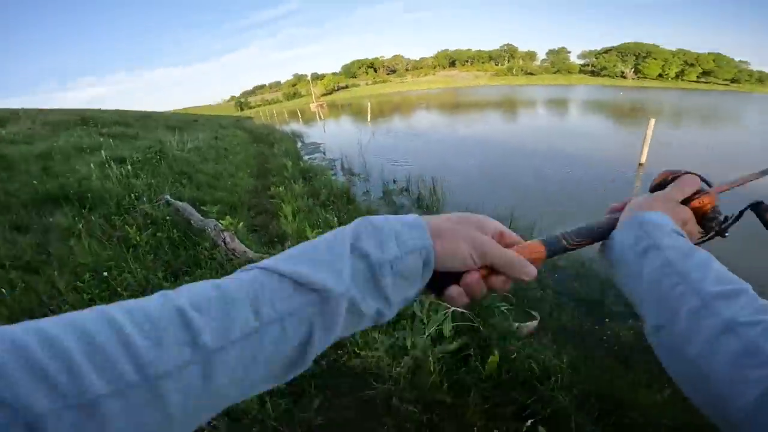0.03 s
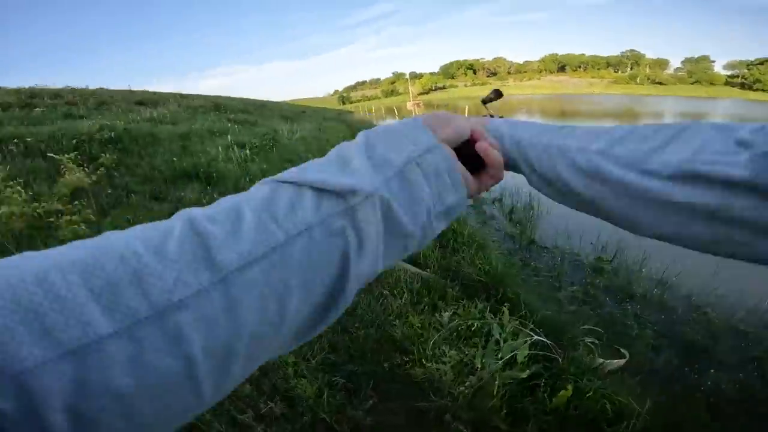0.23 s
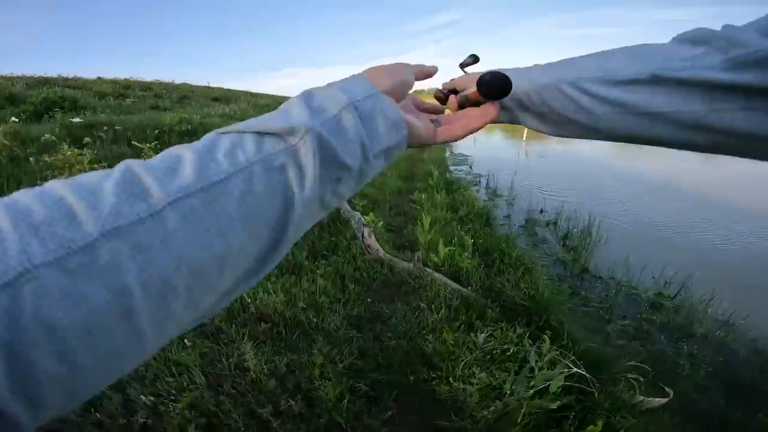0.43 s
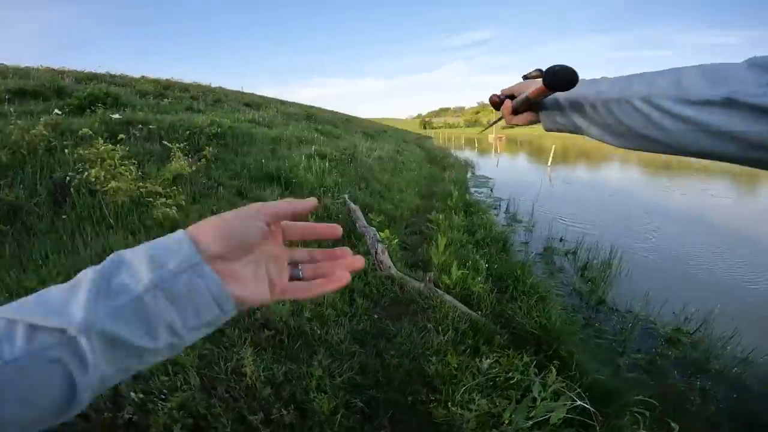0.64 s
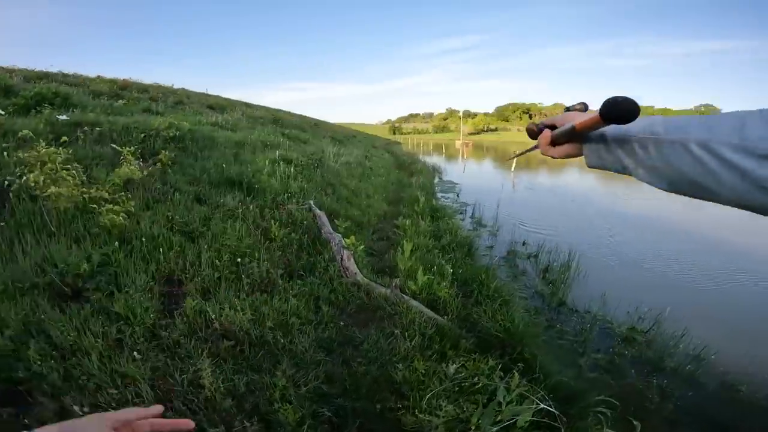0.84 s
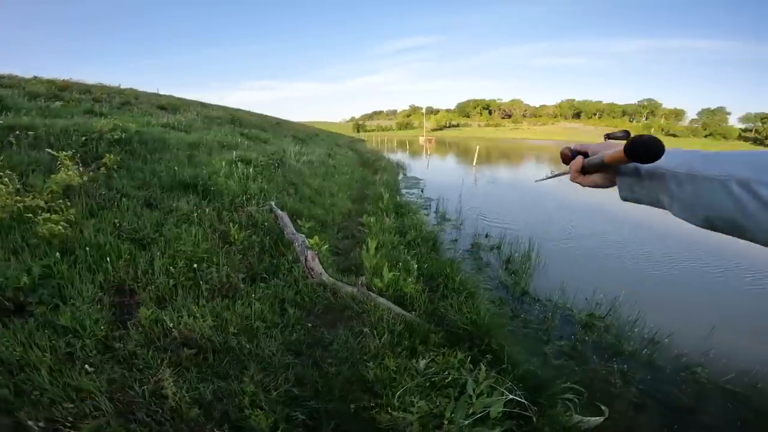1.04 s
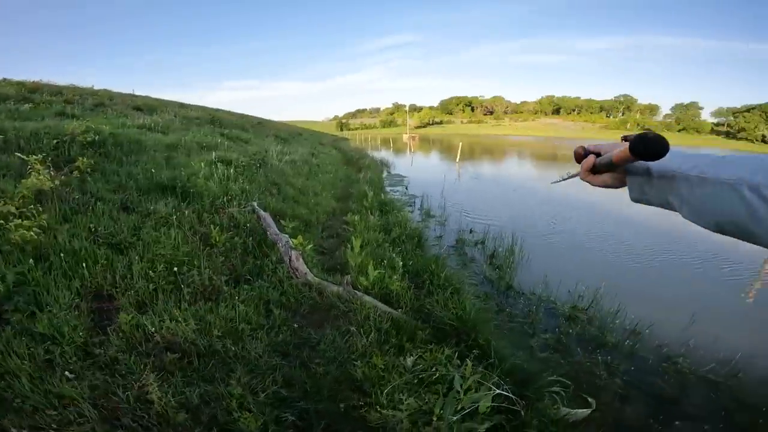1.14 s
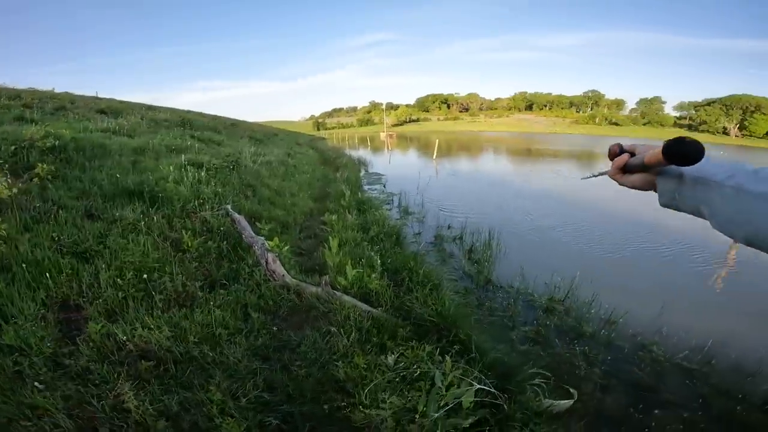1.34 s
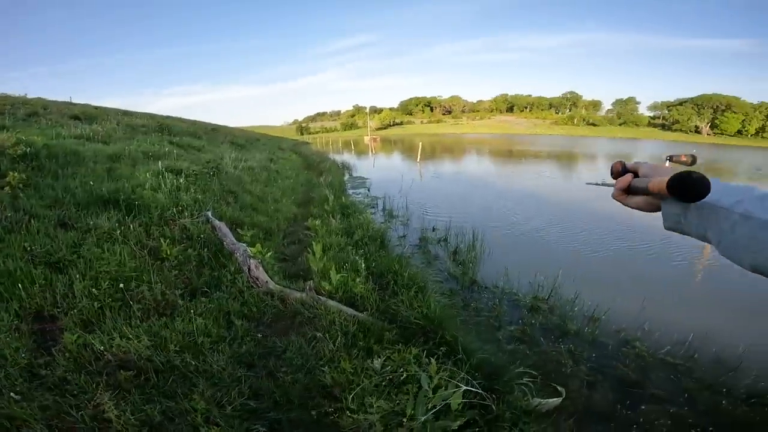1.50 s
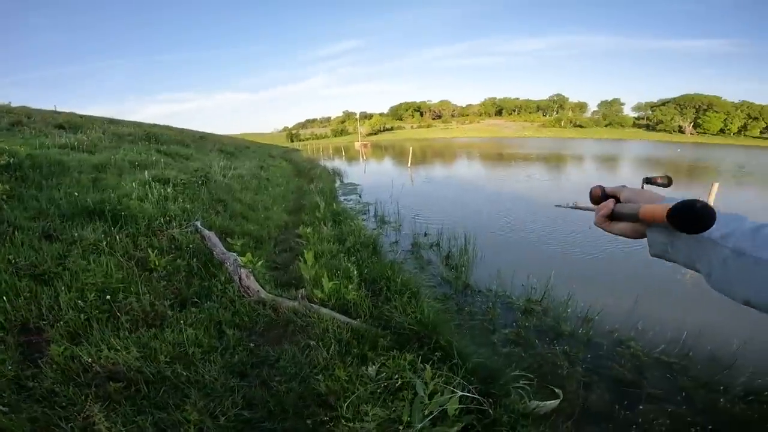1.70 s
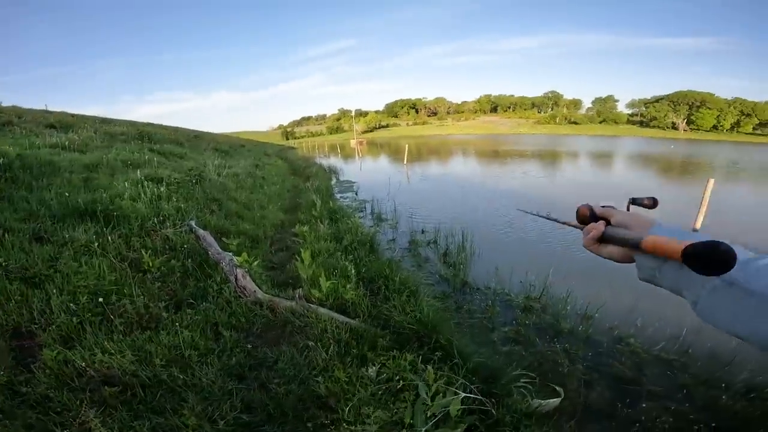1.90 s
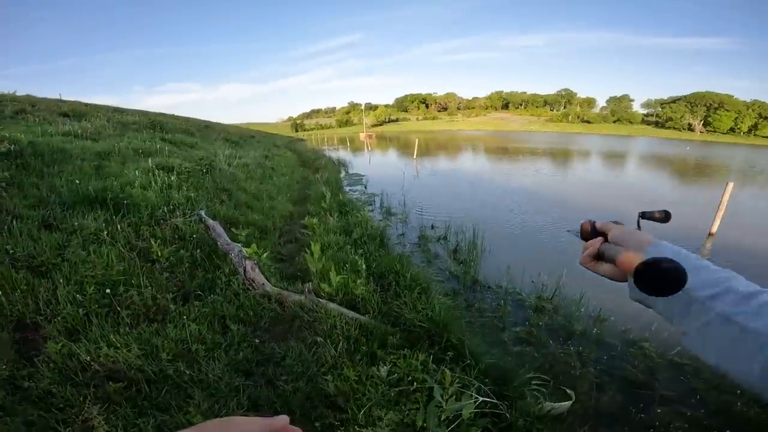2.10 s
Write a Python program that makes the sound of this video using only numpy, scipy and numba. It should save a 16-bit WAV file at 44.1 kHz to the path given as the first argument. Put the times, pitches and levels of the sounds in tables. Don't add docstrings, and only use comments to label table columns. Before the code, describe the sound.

A fishing reel whirs through a cast, its pitch falling as line hisses out beside a pond

```python
import sys
import numpy as np
from scipy import signal
from scipy.fft import rfft, irfft
from scipy.io import wavfile
from scipy.ndimage import uniform_filter1d
from numba import njit

SR = 44100
rng = np.random.default_rng(int(sys.argv[2]) if len(sys.argv) > 2 else 0)


def decibels_to_gain(level_db):
    exponent = np.asarray(level_db, float) / 20
    return 10 ** exponent


def dump(signal):
    limited = np.clip(np.atleast_2d(signal).T, -1, 1)
    pcm = np.round(limited * 32767).astype(np.int16)
    wavfile.write(sys.argv[1], SR, pcm)


N = 94815
TIME = np.arange(N) / SR

# [f/Hz, level/dB per Hz]
WIND_SPECTRUM = [(15, -8), (30, -14), (60, -12.5), (125, -23), (165, -17), (220, -21.5), (400, -34.5),
                 (800, -52)]
# [t/s, level/dB]
GUST_LEVEL = [(0, -48.5), (.2, -47), (.3, -38), (.42, -47.5), (.7, -54), (.98, -53), (1.17, -54),
              (1.3, -53), (1.55, -53.5), (1.8, -51.5), (2.05, -48.5), (2.15, -53.5)]
# [f/Hz, level/dB per Hz]
MEADOW_SPECTRUM = [(150, -33), (350, 0.5), (1300, -1), (2500, -17.5), (4500, -18), (7500, -30),
                   (14000, -47)]
# [t/s, peak level/dB, width/s, 1 pull first or -1 push first]
BODY_JOLTS = [(.495, -52, .016, 1), (.881, -44, 0.0095, -1), (0.981, -40.5, 0.0079, -1),
              (1.006, -47.5, 0.014, 1), (1.154, -40.5, 0.0056, 1), (1.385, -44.5, 0.0064, 1),
              (1.433, -42.5, 0.0051, 1), (1.531, -45.5, 0.0093, 1), (2.035, -49, 0.0067, -1),
              (2.14, -47, .01, -1)]
# [f/Hz, level/dB per Hz]
CLOTH_SPECTRUM = [(150, -31), (400, -10.5), (1000, -8), (3800, -12), (7500, -18.5), (12000, -30.5),
                  (15000, -34)]
# [t/s, level/dB]
RUSTLE_LEVEL = [(0, -57.5), (.055, -49.5), (.075, -53), (.125, -50), (.155, -49.5), (.222, -49.5),
                (.255, -34), (.272, -47.5), (.4, -57), (.89, -63.5), (.92, -56), (.97, -69), (1.3, -72),
                (1.42, -63.5), (1.66, -72), (1.71, -73.5), (2.0, -73.5), (2.11, -64.5)]
# [t/s, peak level/dB, ring f/Hz]
CLICK_RINGS = [(0.011, -41.5, 7660), (0.0518, -36, 1700), (.0525, -35, 2700), (.058, -37, 3570),
               (.06, -43, 1050), (0.139, -38, 1490), (.155, -35, 1020), (.171, -29, 980),
               (0.2655, -18.5, 1430), (.2655, -30, 2970), (.2655, -33, 4740), (0.32, -31, 3860),
               (.341, -34, 4900), (.364, -26, 4860), (0.375, -22, 3860), (0.386, -25.5, 2780),
               (1.3755, -43, 3400), (1.3795, -40.5, 2080), (1.3805, -44, 3240), (1.388, -44, 3840),
               (1.6955, -46.5, 3800), (1.6958, -46.5, 7160), (1.6955, -52, 10100), (1.7535, -47.5, 3680),
               (1.766, -53, 3230), (1.766, -57, 6900), (1.7728, -50, 2900), (1.786, -50, 2750),
               (1.811, -50.5, 7400), (1.813, -51.5, 2770), (1.97, -54, 2900), (2.022, -59, 7240),
               (2.1042, -46, 3320)]
# [f/Hz, level/dB]
SNAP_MODES = [(2900, 5), (4400, 3.5), (7900, 6), (12300, -15)]
# [t/s,
# decay/s, level/dB, centre f/Hz, width f/Hz]
SCUFF_BANDS = [(0.277, 0.087, -52.5, 7560, 2200), (0.282, 0.045, -43.5, 1160, 1190),
               (0.307, 0.025, -38, 1620, 1180), (0.313, 0.024, -39, 436, 695),
               (1.375, 0.017, -48, 2416, 4430), (1.377, .03, -55, 899, 920),
               (1.401, 0.0078, -56.5, 910, 242), (1.418, .007, -48.5, 1530, 350),
               (1.373, 0.16, -63.5, 7170, 3040), (1.42, 0.024, -60, 3500, 1990),
               (1.475, 0.027, -71, 6580, 580), (1.533, 0.023, -60.5, 6340, 500),
               (1.539, 0.032, -57.5, 5390, 590), (1.555, 0.059, -65.5, 3930, 1400),
               (1.601, 0.067, -65.5, 3640, 1200), (1.453, 0.12, -72.5, 6580, 1200),
               (1.753, 0.048, -67, 3260, 1600), (2.012, 0.019, -63, 2320, 4870)]
# [f/Hz, level/dB per Hz]
RUSH_SPECTRUM = [(90, -33), (170, -2.5), (2000, -7), (5000, -5), (8000, -18), (12000, -44), (15000, -33)]
# [t/s, centre f/Hz, level/dB]
ROD_SWEEP = [(.27, 7740, -62), (.298, 7600, -45.5), (.315, 1950, -40), (.335, 2330, -39),
             (.37, 3880, -40.5), (.39, 3930, -42), (.403, 4400, -45.5), (.45, 4800, -51),
             (.55, 4400, -68.5)]
# [f/Hz, level/dB per Hz]
LINE_SPECTRUM = [(3000, -23), (7200, 1), (9300, -4.5), (12000, -5), (14000, -13)]
# [t/s, pass f/Hz, level/dB]
SPOOL_SPEED = [(.36, 494, -43), (.42, 504, -50), (.496, 507.3, -48), (.544, 489.8, -50.5),
               (.59, 460.4, -51.5), (.634, 456.8, -50), (.7, 420.2, -53.5), (.775, 391, -53),
               (.815, 400, -55), (.894, 349.8, -56.5), (.944, 346.1, -59.5), (1.004, 339.3, -60.5),
               (1.058, 315, -62), (1.104, 308, -60.5), (1.246, 272, -65), (1.3, 269.5, -62),
               (1.37, 233, -73)]
# [f/Hz, level/dB]
PASS_SPECTRUM = [(2600, -8), (3300, 0)]
# [f/Hz, level/dB]
REEL_BODY = [(900, -35), (1400, -11), (1950, -5), (2800, -9.5), (3500, 1.5), (4000, 1.5), (4600, -10.5),
             (5200, -29.5), (9000, -29.5)]
# [order of the pass rate, start t/s, end t/s, level/dB]
BEARING_WHINES = [(4, 0.43, 0.68, -64), (8, 0.346, 0.5, -67), (8, 0.57, 0.71, -58), (9, .39, 0.59, -61.5),
                  (9, 0.59, 0.81, -68), (10, 0.47, 0.77, -66), (10, 0.72, 0.875, -67), (5, 0.34, 0.57, -64),
                  (5, 0.775, 0.83, -57), (6, 0.74, 1.16, -73.5), (14, 0.47, 0.7, -68), (15, 0.57, 0.8, -69),
                  (10, 0.87, 1.006, -65), (24, 1, 1.17, -76)]
# [t/s, ring f/Hz, level/dB]
PIN_RING = [(.95, 12400, -79), (1.2, 11510, -78), (1.318, 11310, -72), (1.327, 10460, -61),
            (1.345, 9590, -60), (1.353, 10400, -70), (1.367, 10270, -64), (1.385, 9890, -78)]
# [f/Hz, level/dB]
SIDE_LEVEL = [(30, -15), (125, -6), (500, -9), (2000, -7), (4000, -14), (8000, -18), (12000, -6)]
# [f/Hz, level/dB]
LEFT_LEAN = [(30, -0.5), (125, 0), (2000, -3), (8000, -1.5), (12000, 3)]
# [f/Hz, level/dB]
PORT_HOUSING = [(4700, 0.5), (5400, -2.5), (6500, 4.5), (8000, 3), (9300, -0.5), (12500, 1.5), (14000, -8),
                (15500, -10)]


def level(x, db):
    return x * decibels_to_gain(db) / np.sqrt(np.mean(x ** 2))


def curve(table, col):
    return np.interp(TIME, np.array(table)[:, 0], np.array(table)[:, col])


def colour(x, points, power=1):
    hz, db = np.array(points, float).T
    log_hz = np.log(np.arange(N // 2 + 1) * SR / N + 1)
    return irfft(rfft(x) * decibels_to_gain(power * np.interp(log_hz, np.log(hz), db)), N)


@njit
def svf(x, hz, width):
    y, b, l = np.empty(len(x)), 0., 0.
    for i in range(len(x)):
        g, k = np.tan(np.pi * hz[i] / SR), width[i] / hz[i]
        v = (b + g * (x[i] - l)) / (1 + g * (g + k))
        b, l, y[i] = 2 * v - b, l + 2 * g * v, k * v
    return y


def band(x, hz, width_hz):
    return svf(x, hz + 0 * TIME, width_hz + 0 * TIME)


def noise():
    return rng.standard_normal(N)


def walk(rate):
    k = int(SR / rate)
    held = np.repeat(rng.standard_normal(N // k + 1), k)
    return 1.196 * uniform_filter1d(uniform_filter1d(held, k), k)[:N]


def ring(at, hz, t60, rise=.0001):
    age = np.maximum(TIME - at, 0)
    onset = 1 - np.exp(-(age / rise) ** 2)
    return np.sin(2 * np.pi * hz * age) * np.exp(-np.log(1000) * age / t60) * onset


def decay(at, seconds):
    return (TIME >= at) * np.exp(-np.maximum(TIME - at, 0) / seconds)


def fade(a, b, edge):
    return np.clip((TIME - a) / edge, 0, 1) * np.clip((b - TIME) / edge, 0, 1)


def air():
    low = level(colour(noise(), WIND_SPECTRUM + [(2000, -80)]), 0)
    octaves_hz = 19.1 * 2 ** np.arange(6)
    wind = sum(decibels_to_gain(3 * walk(8.55)) * band(low, hz, 0.69 * hz) for hz in octaves_hz)
    meadow = level(colour(noise(), MEADOW_SPECTRUM), -69.5) * decibels_to_gain(walk(4.3))
    return level(wind, 0) * decibels_to_gain(curve(GUST_LEVEL, 1)) + meadow


def bump():
    hit_s, width_s, left_lag_s = 0.2488, 0.0094, .004
    u = (TIME - hit_s - np.array([[left_lag_s], [0]])) / width_s
    lead_in = 0.42 * (u / 2) * np.exp(-u * u / 8) * (u < 0)
    push = u * np.exp(.5 - u * u / 2) + lead_in
    sway = decibels_to_gain(-17.5) * (ring(0.375, 4, t60=0.66) + np.exp(-((TIME - .195) / 0.026) ** 2))
    jolts = 0
    for t, db, s, way in BODY_JOLTS:
        v = (TIME - t) / s
        jolts = jolts + np.sign(way) * decibels_to_gain(db) * v * np.exp(.5 - v ** 2 / 2)
    pan = lambda db: decibels_to_gain(np.array([[db], [-db]]) / 2)
    return decibels_to_gain(-19) * (push + sway) * pan(-6.5) + jolts * pan(-4)


def sleeve():
    grains_per_s, spread_db = 16000, 1.3
    draw = rng.random((2, N))
    grains = (draw[0] < grains_per_s / SR) * decibels_to_gain(-spread_db * np.log(draw[1])) * noise()
    return level(colour(grains, CLOTH_SPECTRUM), 0) * decibels_to_gain(curve(RUSTLE_LEVEL, 1) + walk(39.7))


def clicks(hiss):
    out = 0
    for t, db, hz in CLICK_RINGS:
        crack = decibels_to_gain(-15) * hiss * decay(t, .001)
        out = out + decibels_to_gain(db) * (ring(t, hz, t60=.009, rise=.0006) + crack)
    return out


def snap(hiss):
    at = 1.6752
    modes = sum(decibels_to_gain(db) * ring(at, hz, t60=.004) for hz, db in SNAP_MODES) / 2
    crack = decibels_to_gain(-8) * noise() * decay(at, .0005)
    tail = decibels_to_gain(-19) * hiss * decay(at, .016)
    return decibels_to_gain(-37) * (modes + crack + tail)


def scuffs():
    rub = noise() * decibels_to_gain(1.23 * walk(250))
    out = 0
    for t, s, db, hz, width in SCUFF_BANDS:
        squeak = level(band(band(rub, hz, width), hz, width), db)
        out = out + squeak * np.clip((TIME - t) / 0.0012, 0, 1) * decay(t, s)
    return out


def handling():
    hiss = level(colour(noise(), CLOTH_SPECTRUM), 0)
    return clicks(hiss) + snap(hiss) + scuffs()


def rod():
    hz = curve(ROD_SWEEP, 1)
    hump = level(band(noise(), hz, .5 * hz), 0)
    rush = level(colour(noise(), RUSH_SPECTRUM), 5.5)
    swing_db = curve(ROD_SWEEP, 2) - 5.5 + 2 * walk(87.8)
    return (hump + rush) * decibels_to_gain(swing_db) * fade(0.2947, .56, 0.0082)


def line():
    hiss = level(colour(noise(), LINE_SPECTRUM), -13.5)
    flow_db = 0.4 * (curve(SPOOL_SPEED, 2) + 51) - 49.5 + 2.0 * walk(19.56)
    return hiss * decibels_to_gain(flow_db) * fade(0.534, 1.69, 0.055)


def harmonic(phase, k):
    return np.cos(2 * np.pi * k * phase + .16 * k * k)


def whir(phase):
    pulses = sum(decibels_to_gain(2.6 * walk(11.17)) * harmonic(phase, k) for k in range(2, 22))
    blur = decibels_to_gain(-24 * np.maximum(TIME - 1.0, 0))
    rattle = level(np.exp(-(phase % 1) / 0.48) * noise(), 0)
    drive = blur * colour(level(pulses, 0), PASS_SPECTRUM) + rattle
    return level(colour(drive, REEL_BODY), 0) * decibels_to_gain(curve(SPOOL_SPEED, 2)) * fade(0.34, 1.7, 0.05)


def whines(phase):
    out = 0
    for k, a, b, db in BEARING_WHINES:
        out = out + decibels_to_gain(db + 2 * walk(23.0)) * fade(a, b, 0.04) * harmonic(phase, k)
    return out


def pins(phase):
    turn = phase / 2
    strike = np.diff(np.floor(turn), prepend=0) * decibels_to_gain(2 * walk(77.8))
    tick = strike + 0.26 * np.exp(-(turn % 1) / .05) * noise()
    hz, width_hz = curve(PIN_RING, 1), 1800
    rung = band(band(tick, hz, width_hz), hz, width_hz)
    return level(rung, 0) * decibels_to_gain(curve(PIN_RING, 2)) * fade(0.87, 1.385, .004)


def reel():
    pass_hz = curve(SPOOL_SPEED, 1) * (1 + 0.00193 * walk(60))
    phase = np.cumsum(pass_hz) / SR
    return whir(phase) + whines(phase) + pins(phase)


def diffuse():
    return air() + sleeve() + rod() + line()


def scene():
    gear = handling() + reel()
    mid = gear + diffuse()
    side = colour(np.roll(gear, 37) + diffuse(), SIDE_LEVEL)
    left = colour(mid + side, LEFT_LEAN, 1 / 2)
    right = colour(mid - side, LEFT_LEAN, -1 / 2)
    port_lag_s = 1.7e-5
    early = np.exp(2j * np.pi * np.arange(N // 2 + 1) * SR / N * port_lag_s)
    return np.array([left, irfft(rfft(right) * early, N)]) + bump()


def top_cut(x):
    return signal.sosfilt(signal.butter(12, 15610, fs=SR, output="sos"), x)


def record(dry):
    limit_db, release_s = -29, .02
    loud = uniform_filter1d(np.abs(dry).max(axis=0), int(release_s * SR))
    gain = np.minimum(1, decibels_to_gain(limit_db) / (loud + 1e-9)) ** 1.5
    bass = colour(dry, [(120, 0), (300, -40)])
    mix = bass + gain * colour(dry - bass, PORT_HOUSING)
    return top_cut(mix)


dry = scene()
out = record(dry)
dump(out)
```